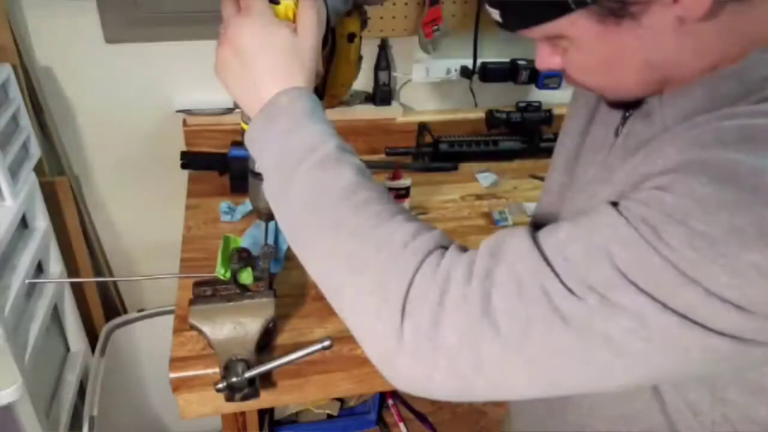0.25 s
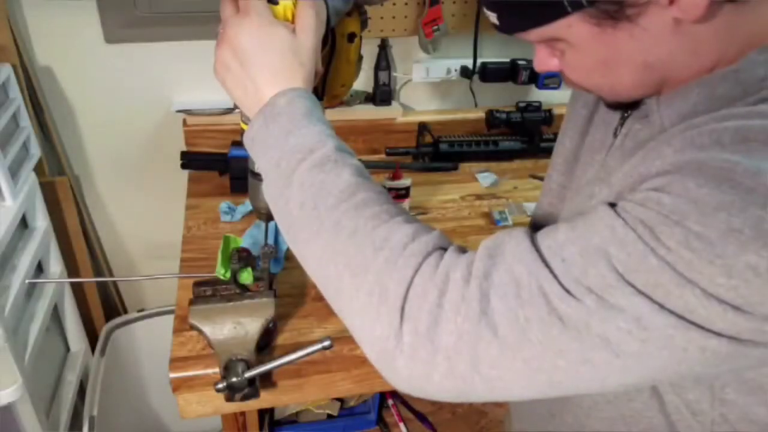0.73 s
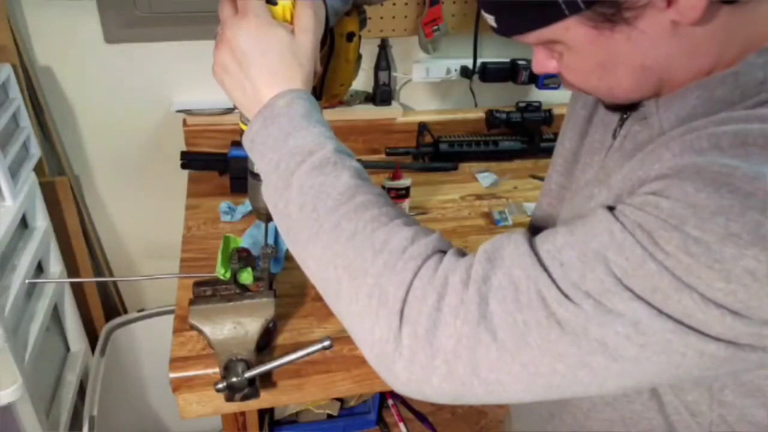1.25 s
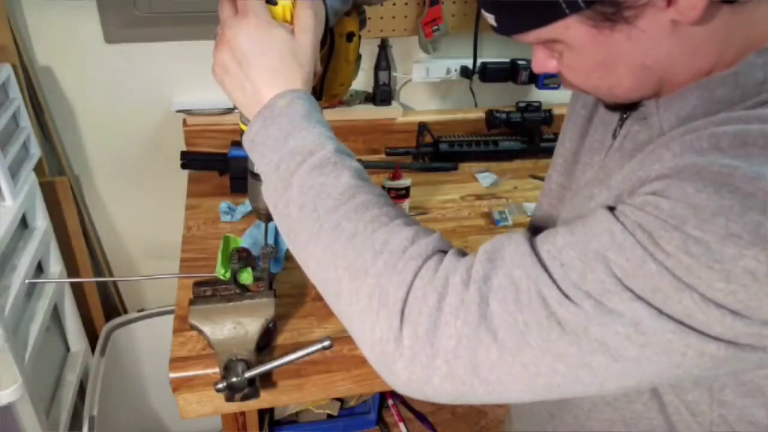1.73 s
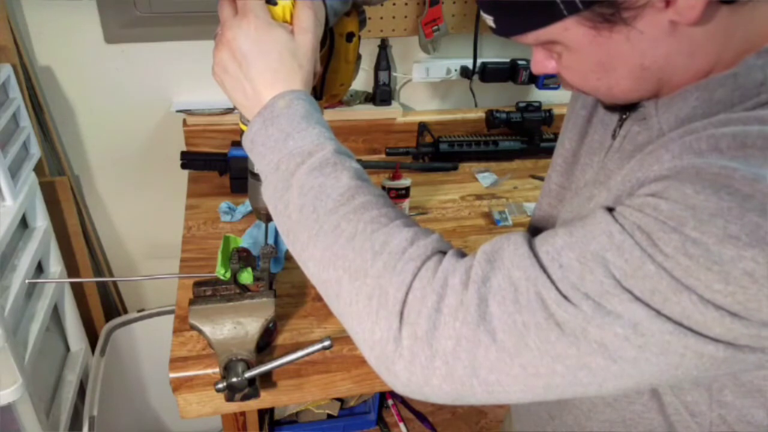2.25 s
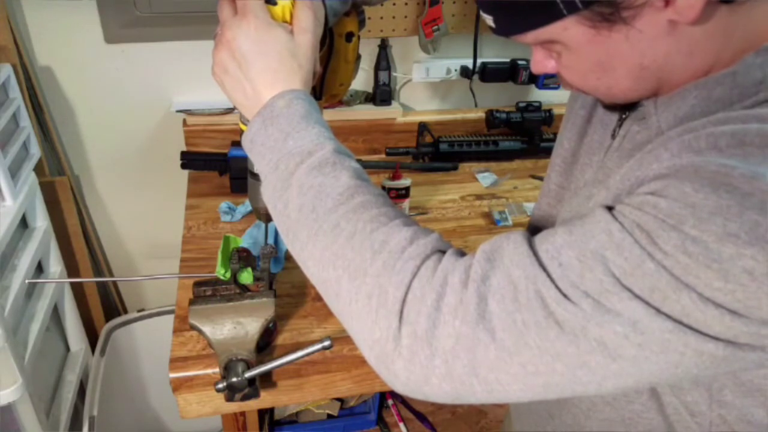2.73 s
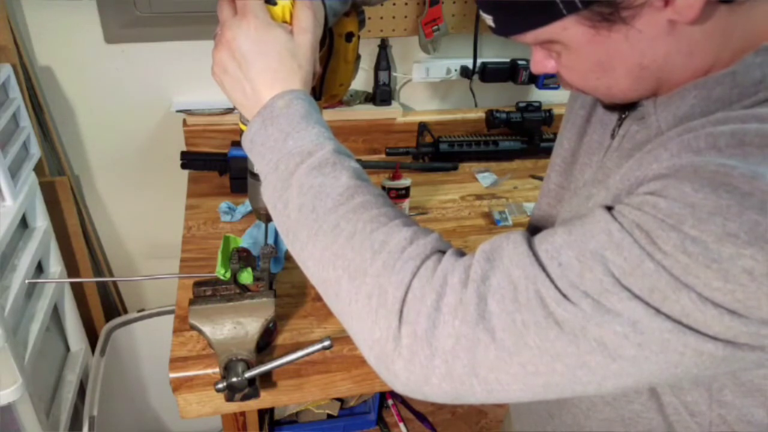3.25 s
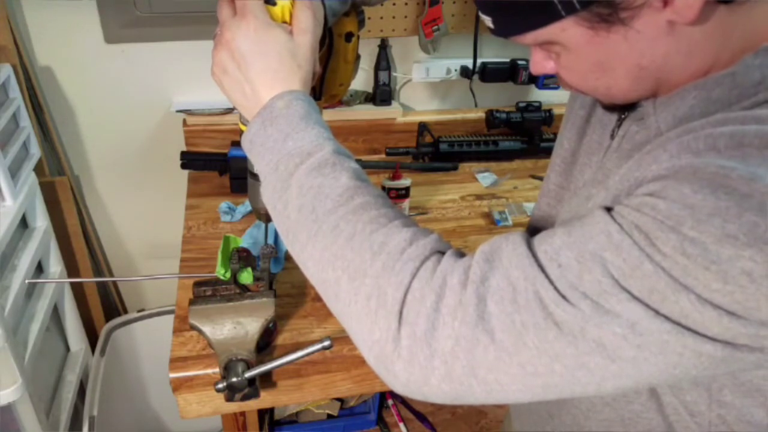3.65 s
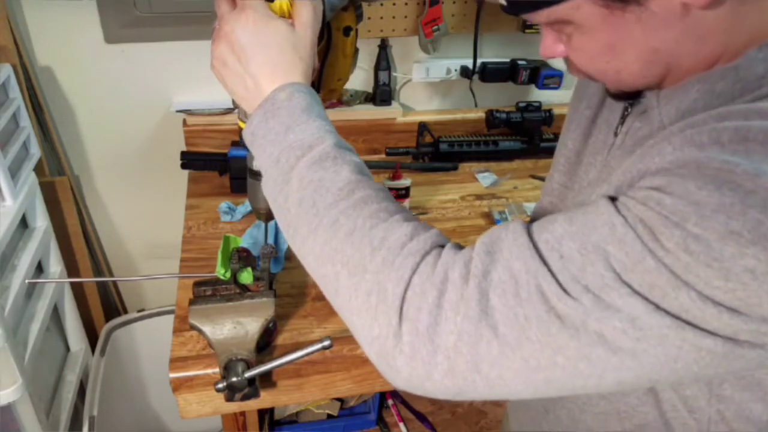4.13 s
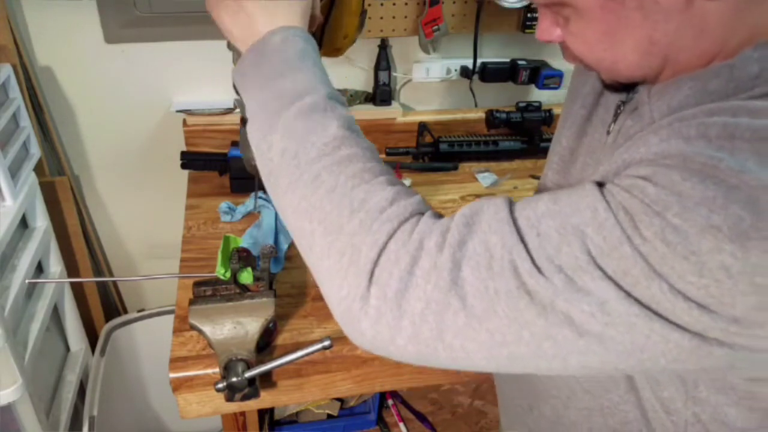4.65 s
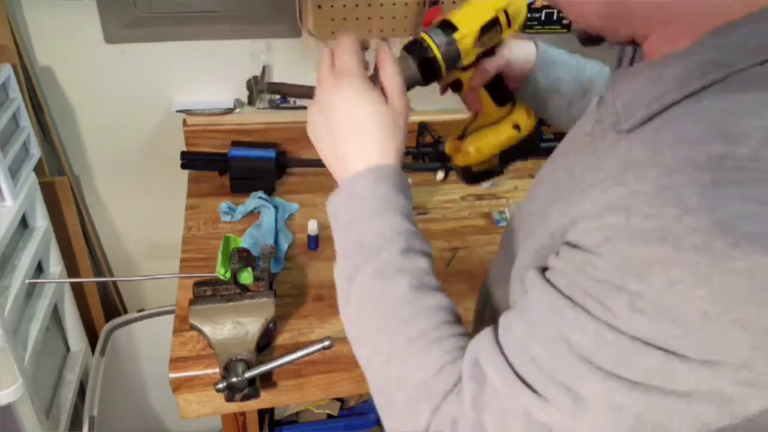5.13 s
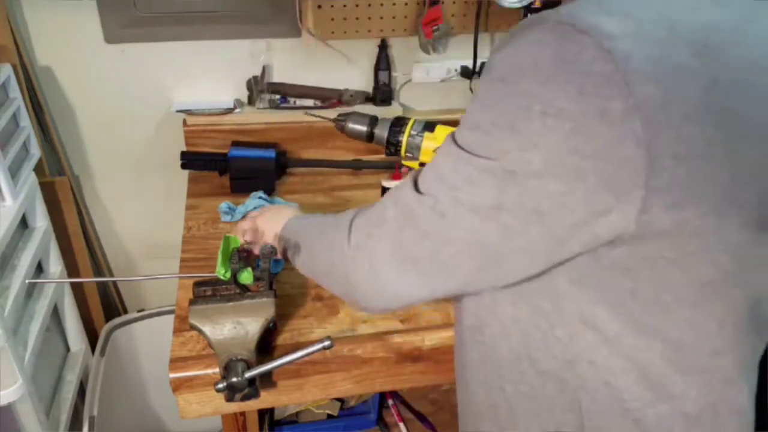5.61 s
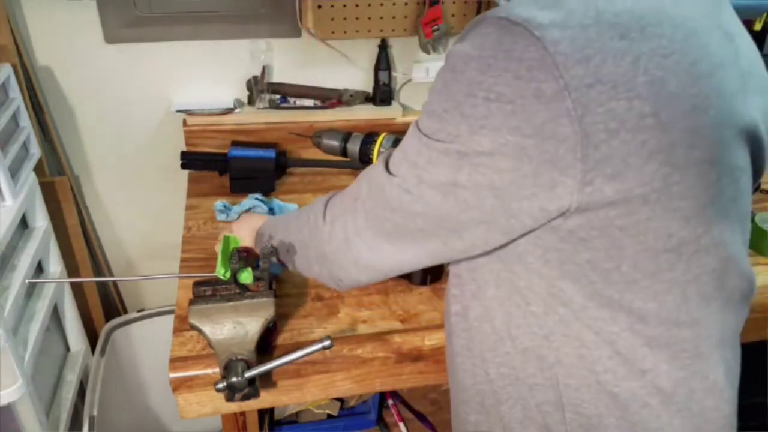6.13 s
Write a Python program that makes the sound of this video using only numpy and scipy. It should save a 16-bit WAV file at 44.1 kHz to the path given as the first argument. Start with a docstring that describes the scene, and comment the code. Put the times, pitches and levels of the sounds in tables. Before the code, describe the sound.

A cordless drill grinds through metal, squealing in fits, and stops with a clack, followed by a short blip, a click and bench knocks.

```python
"""In a small workshop a cordless drill runs light on a metal block in a vise, gears whining, bit skating.
The bit bites, the motor bogs down, then it cuts steadily with a thin squeal; a distant machine starts up.
The trigger is let go and blipped once more, and each time the brake rattles the gears.
A small hard part clicks, and soft knocks on the bench follow over the machine's hum."""
import sys
import numpy as np
from scipy import signal
from scipy.fft import rfft, irfft, next_fast_len
from scipy.io import wavfile
from scipy.ndimage import uniform_filter1d

SR = 44100
rng = np.random.default_rng(int(sys.argv[2]) if len(sys.argv) > 2 else 0)


def bounce(signal):
    """Save signal as a 16-bit WAV file at the path given by the first command-line argument."""
    frames = np.transpose(np.atleast_2d(signal))
    limited = np.clip(frames, -1, 1)
    pcm = np.round(limited * 32767).astype(np.int16)
    wavfile.write(sys.argv[1], SR, pcm)


N = 280917
TIME = np.arange(N) / SR
FREQ = np.maximum(np.arange(N // 2 + 1) * SR / N, 1)
FREE_HZ, LOADED_HZ, BOGGED_HZ, STALL_HZ = 217.24, 147.2, 143, 106.2  # rotor rates as the load grows
GLIDE_HZ_PER_S = 190  # a change of rotor rate this fast counts as a full glide

# The speed the cut allows with the trigger held. Each row: time in seconds, rotor rate in Hz.
ROTOR_SPEED = [(.15, 215.1), (.55, 214.2), (.75, 215.2), (1.16, 213.3), (1.22, 204), (1.34, 154),
               (1.5, 105), (1.57, 97), (1.69, 97.3), (1.78, 110), (1.89, 118), (2.0, 133.5), (2.13, 143.7),
               (2.27, 146.5), (2.6, 147.5), (3.0, 147.1), (3.8, 145.8), (4.45, 146), (4.6, 149.3),
               (4.68, 154), (4.8, 170), (5.1, 199), (5.21, 200)]
# The long cut and the blip. Each row: trigger pressed in seconds, let go in seconds.
TRIGGER_PULLS = [(-1, 4.793), (5, 5.232)]
# The colour of the rattle and the skating. Each row: frequency in Hz, level in dB.
RATTLE_COLOUR = [(200, -24), (320, -31), (600, -7.5), (1300, -0.5), (2400, -1.5), (3000, -5), (4000, 6),
                 (8000, -11)]


def drill(spin_up_s=.032, spin_down_s=.17, drift=.001255, judder=.009):
    """One rotor drives whine, rattle and boom; the sag in its speed tells how hard the bit works."""
    # How keenly the bit cuts. Each row: time in seconds, dB over its usual scrape.
    bite = [(.07, 0), (.35, -0.5), (.45, 0.5), (.72, 3), (.86, -3), (1.04, 3), (1.29, 1.5), (1.44, -4.5),
            (1.67, -7.5), (1.77, -3), (1.98, -5), (2.33, -5.5), (2.52, -1), (2.9, -1.5), (3.25, -3.5),
            (3.68, -2.5), (3.76, 0), (4.28, -3.5), (4.4, 0), (4.8, -0.5)]
    # The edge catches (+) or slips (-) for an instant. Each row: time in seconds, accent in dB.
    catches = [(0.273, -5.5), (.3, 2.5), (.35, -2.5), (.47, 2), (.59, 1), (.72, 0.5), (1.16, 1.5),
               (1.76, 2), (2.0, 1.5), (2.19, 2), (2.45, 2), (2.71, 0), (2.89, 1.5), (3.5, 4), (4.42, 0),
               (4.785, 1.5)]
    held_hz, = curves(ROTOR_SPEED)
    hz = held_hz * np.max([gate(on, off, spin_up_s, spin_down_s) for on, off in TRIGGER_PULLS], axis=0)
    load = np.clip((FREE_HZ - held_hz) / (FREE_HZ - LOADED_HZ), 0, 1)
    stall = np.clip((BOGGED_HZ - held_hz) / (BOGGED_HZ - STALL_HZ), 0, 1)
    shifting = 4 * load * (1 - load)  # peaks at half load
    unsteady = stall + shifting
    turns = np.cumsum(hz * (1 + drift * wander(15.7) + judder * unsteady * wander(44))) / SR
    grabbing = uniform_filter1d(np.clip(-np.gradient(held_hz) * SR / GLIDE_HZ_PER_S, 0, 1), size=4000)
    # The drill leaves the work between the two pulls.
    lifted = np.interp(TIME, [TRIGGER_PULLS[0][1], TRIGGER_PULLS[1][0]], [0, 1])

    bite_db, = curves(bite)
    catch_db = sum(db * np.exp(-((TIME - s) / .021) ** 2) for s, db in catches)
    gear_db = -32.5 + .6547 * bite_db + catch_db - 2.5 * lifted + trigger_db(.06, .1)
    scrape_db = -30 + .86 * bite_db + .29 * catch_db - 4.5 * lifted + trigger_db(.05, .0837)
    hiss_db = -32.5 + bite_db + .47 * catch_db + 3.5 * lifted + trigger_db(.13, .04)

    whine = gear_whine(turns, gear_db - 2 * shifting, load) * (hz / held_hz) ** 6  # sings once at speed
    rattle = flicker_lows(gear_rattle(turns, gear_db + 2 * grabbing, load))
    rumble = low_rumble(gear_db - 7 * lifted, load)
    boom = bench_boom(np.cumsum(held_hz) / SR) * undb(-9 * unsteady)
    chips = cutting(scrape_db, hiss_db)
    snags = skating(gear_db - 6) * (1 - load) ** 2 * (1 - lifted)
    return whine + rattle + rumble + boom + chips + snags + squeal(stall) + free_bit()


def trigger_db(attack_s, release_s):
    """Fade in dB: a noise of the drill swells with each pull of the trigger and dies away after it."""
    held = sum(gate(on, off, attack_s, 2 * release_s) ** 2 for on, off in TRIGGER_PULLS)
    return 20 * np.log10(held + 1e-9)


def gear_whine(turns, level_db, load, seats_s=.88, glide_db=-10):
    """Rotor, commutator and planet gears sing; load shifts the weight between sets of teeth."""
    # Each row: multiple of the rotor rate, then relative dB running light, under load and bogged down.
    partials = [(3, -10.5, -20, -16), (3.125, -16, -25, -24), (4, -30, -25, -22), (5, -15.5, -8, -9),
                (6, -13, -14, -17), (6.27, -22, -7, -19), (6.75, -25, -22, -18), (7.03, -21, -16, -19),
                (8.15, -17, -19, -16), (9, -11.5, -27, -17), (9.38, -25, -13, -19), (10, -12, -28, -22),
                (10.28, -19, -22, -25), (11.28, -18, -12.5, -8), (12.23, -20, -8, -13),
                (13.26, -26, -7.5, -12), (14.33, -30, -17, -17), (15.15, -35, -20, -20),
                (17.3, -30, -19, -22), (22.5, -18, -14, -10), (23.45, -7.5, -19, -13),
                (26.36, -7, -32, -30)]
    # Gear case resonances that make a passing tone flare. Each row: centre in Hz, width in Hz, boost in dB.
    case_peaks = [(610, 140, 5), (1095, 70, 6), (2230, 170, 8)]
    held_hz, = curves(ROTOR_SPEED)
    bogged = np.clip((BOGGED_HZ - held_hz) / 15, 0, 1)
    # The high tones fade in a glide, and partly once the bit finds its seat.
    gliding = uniform_filter1d(np.minimum(abs(np.gradient(held_hz)) * SR / GLIDE_HZ_PER_S, 1), size=1500)
    seated = np.clip((TIME - seats_s) / .1, 0, 1) * (1 - load)
    damping_db = glide_db * np.maximum(gliding, .6 * seated)
    out = 0
    for multiple, light_db, loaded_db, bogged_db in partials:
        pitch_hz = multiple * held_hz
        mesh_db = light_db + load ** 2 * (loaded_db - light_db) + bogged * (bogged_db - loaded_db)
        flare_db = sum(db / (1 + (2 * (pitch_hz - hz) / width) ** 2) for hz, width, db in case_peaks)
        high = np.clip((pitch_hz - 2200) / 400, 0, 1)
        rough = .49 * (multiple / 6) ** .064  # speed flutter blurs the high tones most
        partial = tone(multiple * turns, rough, flutter_hz=29, lag_rad=.99)
        out = out + partial * undb(mesh_db + flare_db + high * damping_db)
    return out * undb(level_db)


def gear_rattle(turns, level_db, load, throb=.032):
    """Teeth click densely into the housing, a little harder once every rotor turn."""
    # The housing's modes. Each row: pitch in Hz, width in Hz, relative dB running light and under load.
    housing = [(607, 130, 0.5, 6), (894, 52, 8, 6.5), (1060, 63, 7.5, 8), (1540, 190, -3, 2.5),
               (1760, 180, -24, 6), (2000, 140, 7.5, 8.5), (2230, 160, 10, 5.5), (2690, 130, 7.5, -0.5)]
    # The chuck and slow gears run out of true and pulse the rattle.
    # Each row: multiple of the rotor rate, swing in dB running light and under load.
    wobbles = [(.0787, .6, 1.2), (.115, 1.8, .2), (.1574, 1.3, .3), (.305, .8, .3)]
    light_modes = [(hz, width, db) for hz, width, db, _ in housing]
    loaded_modes = [(hz, width, db) for hz, width, _, db in housing]
    teeth = 0
    for modes, share, trim_db in ((light_modes, 1 - load, -1.75), (loaded_modes, load, 1.13)):
        power = colour(RATTLE_COLOUR) ** 2 + mode_power(modes)
        body = np.sqrt(power / (1 + (560 / FREQ) ** 10) / (1 + (FREQ / 3800) ** 8))
        clicks = patter(body, per_second=7000, spread_db=2.6, wet_db=-.4)
        teeth = teeth + np.sqrt(share) * undb(trim_db) * clicks
    chatter_db = (1.9 - .74 * load) * wander(24)  # a skating bit chatters more
    wobble_db = sum((light + load * (loaded - light)) * np.cos(2 * np.pi * multiple * turns)
                    for multiple, light, loaded in wobbles)
    return teeth * (1 + throb * np.cos(2 * np.pi * turns)) * undb(level_db + chatter_db + wobble_db)


def flicker_lows(x, below_hz=600, swing_db=7, trim_db=-6):
    """The low flank of a noise comes and goes."""
    lows = through(x, 1 / (1 + (FREQ / below_hz) ** 12))
    return x + lows * (undb(trim_db + swing_db * np.minimum(wander(16), 1)) - 1)


def cutting(scrape_db, hiss_db):
    """Chips tear off in dense tiny slips; brushes and fan hiss above them."""
    # The colours of the scrape and the hiss. Each row: frequency in Hz, level in dB.
    scrape_colour = [(2000, -37), (3000, -5.5), (3600, -13), (4100, -5.5), (4500, 0), (4750, -0.5),
                     (5050, 1), (5350, -2), (5650, -1), (6100, -4.5), (6900, -6.5), (7900, -21.5),
                     (9300, -13.5), (11000, -21)]
    hiss_colour = [(6000, -51), (8300, -58), (9800, -10.5), (11000, 2.5), (12000, 2), (13200, 3.5),
                   (14500, -5)]
    scrape = patter(colour(scrape_colour), per_second=14000, spread_db=.37, wet_db=2)
    scrape *= undb(scrape_db + 1.33 * wander(21))
    hiss = patter(colour(hiss_colour), per_second=14000, spread_db=.9, wet_db=24)
    hiss *= undb(hiss_db + .68 * wander(27))
    return scrape + hiss


def squeal(stall, rough=.12):
    """Pressed hard, the cutting edge sings in fits at a mode of the bit, raspier near a stall."""
    # The pitch bends with the pressure on the bit. Each row: time in seconds, pitch in Hz.
    bends = [(1.54, 4650), (1.59, 4480), (1.66, 4590), (1.72, 4540), (1.78, 4570), (1.86, 4610),
             (1.91, 4370), (1.952, 4230), (1.975, 4450), (2.02, 4500), (2.3, 4516), (2.45, 4535),
             (2.85, 4532), (3.05, 4513), (4.1, 4518), (4.45, 4520), (4.56, 4458), (4.63, 4485),
             (4.71, 4460), (4.74, 4335)]
    # The fits of squealing. Each row: start in seconds, end in seconds, level in dB.
    fits = [(1.54, 1.57, -40), (1.62, 1.73, -41), (1.77, 1.86, -38), (1.91, 1.98, -36.5), (1.98, 2.09, -36),
            (2.09, 2.2, -33.5), (2.21, 2.35, -34.5), (2.37, 2.75, -44), (2.76, 2.86, -40),
            (2.92, 2.99, -37), (3.02, 3.15, -33), (3.18, 3.25, -37.5), (3.27, 3.33, -37), (3.33, 3.45, -33),
            (3.45, 3.51, -35.5), (3.55, 3.8, -40), (3.82, 3.96, -33), (4.02, 4.28, -39), (4.31, 4.49, -33),
            (4.51, 4.7, -33.5), (4.72, 4.77, -39)]
    hz = curves(bends)[0] + (5 + 25 * stall) * wander(53)
    envelope = np.sqrt(sum((undb(db) * gate(start, end, .011, .024)) ** 2 for start, end, db in fits))
    sputter = (1 + rough * (wander(25) + 1j * wander(38))) * undb(wander(8.1))
    grip = 1 / (1 + np.exp(3 * (wander(45) - 2)))  # the edge lets go for instants
    rasp_depth = .3 * stall
    rasp = (1 + rasp_depth * (wander(110) + 1j * wander(110))) / np.sqrt(1 + 2 * rasp_depth ** 2)
    singing = np.exp(2j * np.pi * np.cumsum(hz) / SR)
    return left_leads(singing * envelope * sputter * grip * rasp, lag_rad=1)


def skating(level_db, snag_s=.0032):
    """Before it bites, the bit snags on the metal in short, irregular scrapes."""
    jolts = abs(grains(per_second=35, spread_db=3.3))
    snags = np.minimum(unit(through(jolts, 1 / (1 + 2j * np.pi * FREQ * snag_s))), 4)
    body = colour(RATTLE_COLOUR) / (1 + (650 / FREQ) ** 6)
    return patter(body, per_second=6000, spread_db=2.4, wet_db=-17) * snags * undb(level_db)


def free_bit(level_db=-29.5):
    """Out of the hole, the bit and chuck ring during the last blip."""
    # Their modes. Each row: pitch in Hz, width in Hz, relative level in dB.
    bit_modes = [(1002, 68, -8), (1340, 70, -7), (1960, 62, 3), (2036, 60, 0), (2176, 49, 3.5),
                 (4370, 200, -1.5), (5560, 100, -1.5)]
    ring = patter(resonances(bit_modes), per_second=4000, spread_db=2.2, wet_db=0)
    return ring * undb(level_db) * gate(*TRIGGER_PULLS[-1], attack_s=.073, release_s=.017)


def brake(clack_db=-16):
    """The spindle lock chatters as the motor is stopped short: a dry clack and the ring of the chuck."""
    # The bursts of chatter. Each row: peak time in seconds, level in dB, swell and fade in seconds.
    bursts = [(4.822, -22, 0.0033, 0.026), (5.254, -17.5, 0.021, 0.022), (5.36, -41, .002, 0.013)]
    # The chuck's modes. Each row: pitch in Hz, width in Hz, relative level in dB.
    chuck_modes = [(570, 240, 3), (1670, 730, 1.5), (1860, 170, -3), (2480, 140, -14), (3480, 160, -1),
                   (4090, 200, 0.5), (4740, 81, 3), (5270, 110, -21), (6000, 160, -22)]
    envelope = sum(undb(db) * np.exp(-np.maximum((s - TIME) / swell, (TIME - s) / fade))
                   for s, db, swell, fade in bursts)
    chatter = through(grains(per_second=3500, spread_db=1.3), resonances(chuck_modes) + undb(clack_db))
    return workshop(unit(chatter) * envelope, wet_db=-.55, t60=.11)


def low_rumble(level_db, load, swing_db=7):
    """A patchy low rumble under the drill; each low band swells and fades at random."""
    # Each row: centre in Hz, width in Hz, relative dB running light and under load.
    low_bands = [(76.6, 37, -31, -25), (131.6, 42, -16, -13.5), (206.4, 53, -18, -25.5),
                 (264, 39, -28, -25), (366.6, 63, -20, -20), (490, 103, -23, -20.5)]
    out = 0
    for hz, width, light_db, loaded_db in low_bands:
        band = patter(resonances([(hz, width, 0)]) ** 2, per_second=3000, spread_db=1.2, wet_db=-.64)
        swell_db = swing_db * np.minimum(wander(26.7), 1.6)
        out = out + band * undb(light_db + load * (loaded_db - light_db) + swell_db)
    return out * undb(level_db)


def bench_boom(turns, mode_hz=134.6, width_hz=25.1, gain_db=-27):
    """The rotor's unbalance makes the bench boom when its rate passes through a resonance."""
    shake = through(np.cos(2 * np.pi * turns), resonances([(mode_hz, width_hz, 0)]) ** 2)
    boom = signal.hilbert(shake) * (1 + .17 * (wander(30) + 1j * wander(30)))
    return left_leads(boom, lag_rad=.2) * undb(gain_db)


def click():
    """A small hard part snaps crisply at the vise and settles."""
    # Its contacts. Each row: start in seconds, level in dB, decay in seconds.
    contacts = [(5.5702, -26.5, .003), (5.5765, -37, .004)]
    # Its modes. Each row: pitch in Hz, width in Hz, relative level in dB.
    part_modes = [(745, 98, 3), (1290, 120, 0), (2350, 500, -8), (3230, 280, -4), (3900, 350, 0),
                  (4500, 240, -4), (5250, 240, -5), (5540, 220, -8), (6270, 290, -13), (12900, 2200, -16)]
    envelope = sum(undb(db) * gate(s, s, .00015, decay) for s, db, decay in contacts)
    ring = unit(through(rng.standard_normal(N), np.sqrt(mode_power(part_modes))))
    return workshop(ring * envelope, wet_db=-4.5, t60=.25)


def knocks(contact_db=-29):
    """Soft handling at the bench: a dull contact and the short ring of bench and vise."""
    # Each row: start in seconds, level in dB, decay in seconds, brightness in Hz, attack in seconds.
    bumps = [(5.85, -51, .05, 1300, .01), (6.171, -33.5, 0.03, 960, 0.005), (6.21, -42, 0.023, 1180, .004)]
    # The modes of bench and vise. Each row: pitch in Hz, width in Hz, relative level in dB.
    bench_modes = [(646, 150, 11), (714, 170, 12), (1260, 150, -2), (1530, 130, -10), (2370, 350, -17)]
    body = resonances(bench_modes) + undb(contact_db)
    out = 0
    for s, db, decay, bright_hz, attack in bumps:
        ring = unit(through(rng.standard_normal(N), body / (1 + (FREQ / bright_hz / 2) ** 4)))
        out = out + ring * undb(db) * gate(s, s, attack, decay)
    return workshop(out, wet_db=1, t60=.24)


def distant_machine(hum_hz=377):
    """A machine starts with an electrical hum and lifts the room's rumble; its drone swells, then slows."""
    # The swells of the drone's lowest tone. Each row: time in seconds, level in dB.
    swells = [(2.5, -57), (2.62, -43.5), (3.3, -39), (3.52, -58), (3.63, -40), (4.2, -31.5), (5.3, -51.5),
              (5.75, -48), (6.13, -53.5)]
    running = np.clip((TIME - swells[0][0]) / .097 + 1, 0, 1)
    drone_hz = np.interp(TIME, [5.72, 6.144], [91.4, 78.3])
    turns = np.cumsum(drone_hz) / SR
    drone = tone(turns, rough=.19, flutter_hz=14, lag_rad=.22) * undb(curves(swells)[0])
    octave = tone(2 * turns, rough=.52, flutter_hz=30, lag_rad=.18) * undb(-52)
    hum = tone(hum_hz * TIME, rough=.3, flutter_hz=10, lag_rad=.4) * undb(-54.5)
    return running * (drone + octave + hum) + room_air(level_db=-69 + 20 * running)


def room_air(level_db):
    """A dark, gently wavering room tone, centred in the bass and wide above it."""
    # Its colour. Each row: frequency in Hz, level in dB.
    air_colour = [(25, -14), (60, -6.5), (120, -5.5), (200, -11), (300, -13.5), (430, -12), (550, -21),
                  (1000, -25.5), (2000, -31.5), (4500, -38), (8000, -49.5), (12000, -42.5), (14500, -45)]
    mid, side = through(rng.standard_normal((2, N)), colour(air_colour))
    side = through(side, np.minimum(FREQ / 700 + .04, 1))
    return unit(np.array([mid + side, mid - side])) * undb(level_db + .9 * wander(8.8))


def workshop(x, wet_db, t60):
    """Close walls add a short diffuse tail to the direct sound."""
    t = TIME[:SR // 2]
    tail = rng.standard_normal((2, len(t))) * np.exp(-np.log(1000) * t / t60) * (t > .002)
    tail /= np.sqrt(np.sum(tail ** 2, axis=1, keepdims=True))
    reverb = signal.fftconvolve(x[None], tail, axes=1)[:, :N]
    return (direct_path(x) + undb(wet_db) * reverb) / np.hypot(1, undb(wet_db))


def direct_path(x, lag_s=.00009):
    """The direct sound reaches the left side first."""
    return np.array([x, through(x, np.exp(-2j * np.pi * FREQ * lag_s))])


def left_leads(wave, lag_rad):
    """A complex tone as a stereo pair, the left side ahead in phase."""
    return np.sqrt(2) * np.real(wave * np.exp(.5j * lag_rad * np.array([[1], [-1]])))


def patter(response, per_second, spread_db, wet_db):
    """A steady, filtered stream of tiny impacts, plus what the walls scatter to each side."""
    direct, left, right = (grains(per_second, spread_db) for _ in range(3))
    return unit(through(direct_path(direct) + undb(wet_db) * np.array([left, right]), response))


def grains(per_second, spread_db):
    """Tiny impacts at random moments and of uneven size."""
    hit = rng.random(N) < per_second / SR
    return unit(hit * rng.standard_normal(N) * undb(spread_db * np.clip(rng.standard_normal(N), -2, 2)))


def tone(cycles, rough, flutter_hz, lag_rad):
    """A partial of rms 1 whose size and phase flutter, a little differently on each side."""
    flutter = 1 + rough * (wander(flutter_hz) + 1j * wander(flutter_hz))
    sides = np.array([np.exp(1j * rough * wander(flutter_hz / 2)) for _ in range(2)])
    return unit(left_leads(flutter * sides * np.exp(2j * np.pi * cycles), lag_rad))


def wander(rate):
    """A smooth random curve of rms 1 that changes about rate times a second."""
    spectrum = np.exp(-(FREQ / rate) ** 2)[FREQ < 4 * rate]
    real, imag = rng.standard_normal((N // 50, 2))[:len(spectrum)].T
    return unit(irfft(spectrum * (real + 1j * imag), next_fast_len(N))[:N])


def gate(start, end, attack_s, release_s):
    """An envelope that rises from start, holds and dies away after end."""
    rise = 1 - np.exp(-np.maximum(TIME - start, 0) / attack_s)
    return rise * np.exp(-np.maximum(TIME - end, 0) / release_s)


def duck(x, band, dips, db):
    """Turn one band down for a few short moments."""
    depth = sum(np.exp(-((TIME - s) / half) ** 4) for s, half in dips)
    return x - through(x, band) * (1 - undb(db * depth))


def resonances(modes):
    """Causal response of a few damped modes."""
    return sum(undb(db) / (1 + 1j * hz / width * (FREQ / hz - hz / FREQ)) for hz, width, db in modes)


def mode_power(modes):
    """Power response of modes that add without cancelling."""
    return sum(abs(resonances([mode])) ** 2 for mode in modes)


def colour(points):
    """Gain at each frequency from (Hz, dB) points."""
    hz, db = np.transpose(points)
    return undb(np.interp(np.log(FREQ), np.log(hz), db))


def curves(rows):
    """Each column of a table after the first, joined by straight lines in time."""
    s, *columns = np.transpose(rows)
    return [np.interp(TIME, s, c) for c in columns]


def through(x, response):
    """Filter by a frequency response."""
    return irfft(rfft(x) * response, N)


def undb(db):
    """Decibels to gain."""
    return 10 ** (np.asarray(db) / 20)


def unit(x):
    """Scale to rms 1."""
    return x / np.sqrt(np.mean(x ** 2))


def scene():
    """Everything at the workbench, over the distant machine."""
    return drill() + brake() + click() + knocks() + distant_machine()


def record(dry, ceiling=.45, top_hz=14550):
    """The two sides differ in colour, the lows dip briefly, peaks are rounded and the top is cut steeply."""
    # The microphone's two sides. Each row: frequency in Hz, left minus right in dB.
    tilt = [(100, -1), (500, -2), (1000, 1.5), (2000, -1.5), (4500, 2), (8000, 7), (12000, -1.5)]
    # Brief dips of the bass and of the low middle. Each row: centre in seconds, half length in seconds.
    bass_dips = [(0.196, 0.04), (0.754, 0.016), (0.86, 0.03), (0.97, 0.014), (1.144, 0.016), (1.626, 0.031),
                 (5.247, 0.028)]
    middle_dips = [(.185, 0.049), (0.412, 0.041), (0.478, 0.017), (0.546, 0.017), (0.711, 0.024),
                   (2.322, 0.048), (2.385, 0.023)]
    lean = np.sqrt(colour(tilt))
    hollow = 1 - .39 * resonances([(298, 38, 0)])  # a narrow scoop in the microphone's colour
    # The sound dies away at the very start and cuts back in.
    opening = undb(-3) * np.exp(-TIME / .009) + gate(.062, TIME[-1], .0027, 1)
    heard = through(dry, hollow * np.array([lean, 1 / lean])) * opening
    heard = duck(heard, 1 / (1 + (FREQ / 450) ** 8), bass_dips, db=-28)
    heard = duck(heard, 1 / (1 + ((FREQ - 455) / 115) ** 12), middle_dips, db=-22)
    heard = ceiling * np.tanh(heard / ceiling)
    return signal.sosfilt(signal.ellip(10, .2, 70, top_hz, fs=SR, output="sos"), heard)


dry = scene()
out = record(dry)
bounce(out)
```